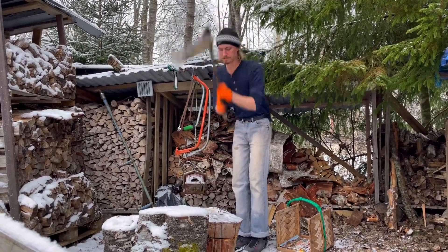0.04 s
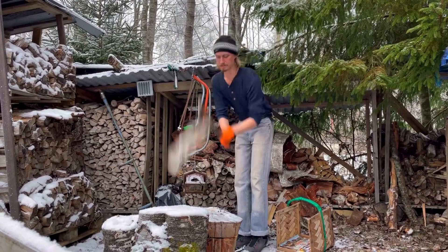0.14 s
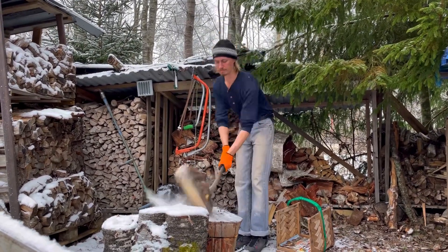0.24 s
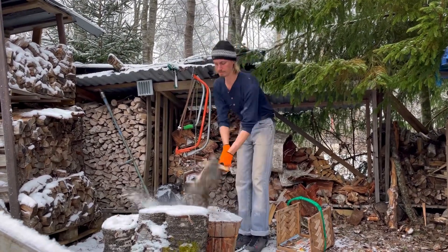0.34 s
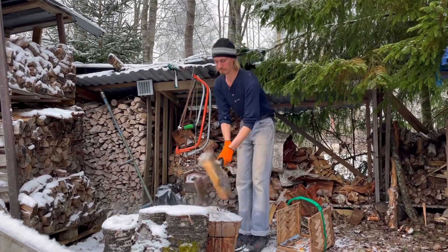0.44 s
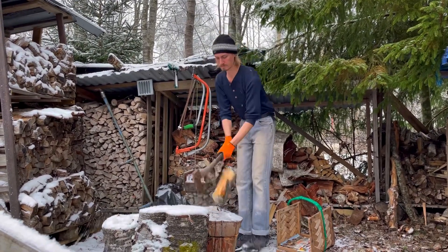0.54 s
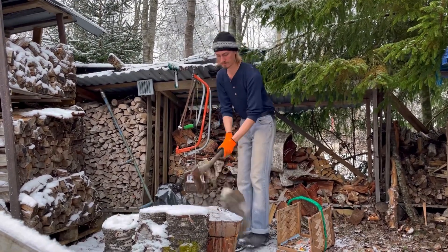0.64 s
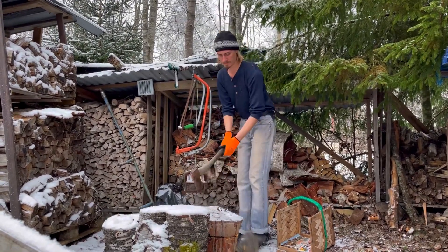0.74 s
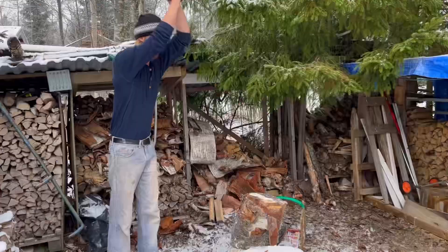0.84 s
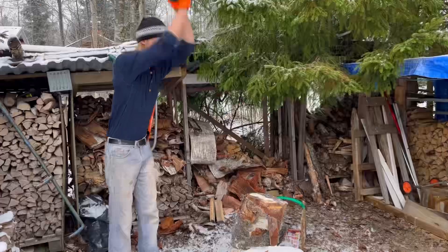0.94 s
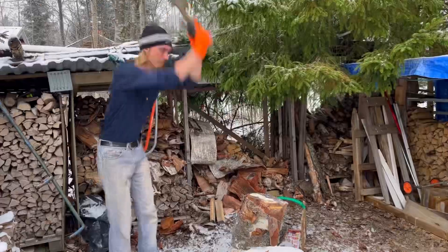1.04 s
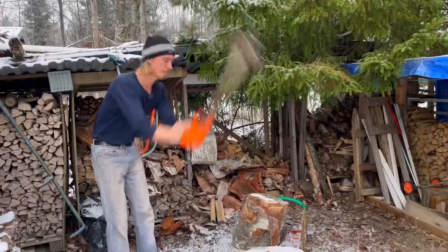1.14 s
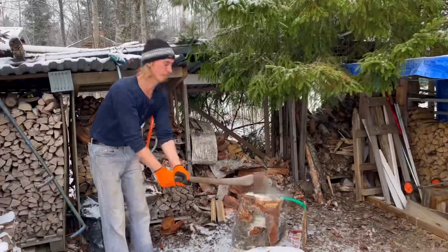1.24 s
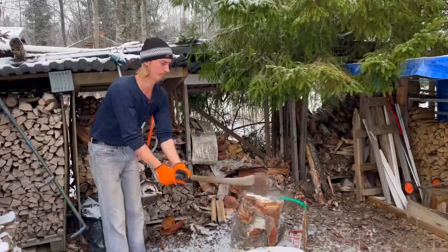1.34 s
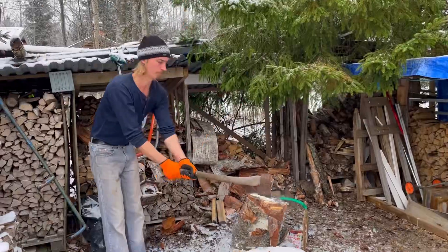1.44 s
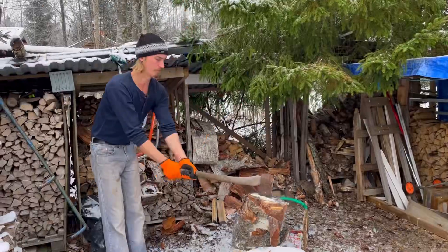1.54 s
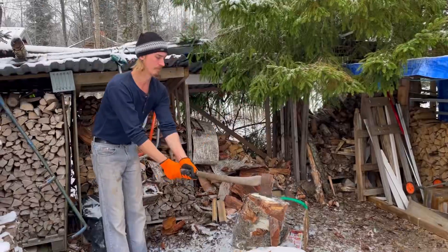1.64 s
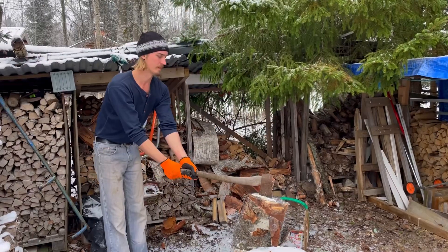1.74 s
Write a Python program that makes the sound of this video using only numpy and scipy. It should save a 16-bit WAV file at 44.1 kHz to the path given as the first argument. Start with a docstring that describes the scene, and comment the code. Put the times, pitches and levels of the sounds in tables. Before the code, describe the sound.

Three axe blows on wood in a quiet snowy yard: a bright splitting crack, light tumbling of pieces, a duller thump cut short abruptly, then a hard knock with ground rumble and faint echo from woodsheds.

```python
"""Axe at a chopping block

Three short shots in a snowy yard, joined by hard cuts. Cracking fibres are noise bursts, the log rings
as decaying modes, and block and frozen ground thud as sines of falling pitch over noise rumble.
Woodsheds and a tree line throw it back by convolution with decaying noise; split pieces scuff in
grainy noise and tick as short tones, over faint filtered-noise air and a far throbbing hum."""
import sys
import numpy as np
from scipy import signal
from scipy.fft import rfft, irfft
from scipy.io import wavfile

SR = 44100
rng = np.random.default_rng(int(sys.argv[2]) if len(sys.argv) > 2 else 0)


def file_out(sig):
    """Save sig as 16-bit WAV at sys.argv[1]."""
    # one column per channel
    cols = np.atleast_2d(sig).T
    # limit, then scale
    lim = np.clip(cols, -1, 1)
    pcm = np.round(lim * 32767).astype(np.int16)
    wavfile.write(sys.argv[1], SR, pcm)


N = 79380
T = np.arange(N) / SR
F = np.maximum(np.fft.rfftfreq(N, 1 / SR), 1)
# hard cuts between the shots: (time [s])
SHOT_CUTS = [0.775, 0.8627]


def undb(db):
    """Decibels to amplitude ratio."""
    return 10 ** (np.asarray(db) / 20)


def curve(table):
    """Frequency response interpolated on a logarithmic frequency axis."""
    hz, value = np.array(table).T
    return np.interp(np.log(F), np.log(np.maximum(hz, 1)), value)


def unit(x):
    """Normalization to an rms of 1."""
    return x / np.sqrt(np.mean(x ** 2))


def band(x, hz, octaves):
    """Band-pass filtering by a Gaussian bell on a log-frequency axis, rms 1."""
    bell = np.exp(-.5 * (np.log2(F / hz) / octaves) ** 2)
    return unit(irfft(rfft(x) * bell, N))


def fade(t, t60):
    """Exponential decay: 60 dB down after t60 seconds, silent before t = 0."""
    return np.exp(-np.log(1000) * np.maximum(t, 0) / t60) * (t >= 0)


def burst(hz, octaves, shape):
    """Band of noise under an envelope, scaled to the energy of that envelope."""
    x = band(rng.standard_normal(N), hz, octaves) * shape
    return x * np.sqrt(np.sum(shape ** 2) / np.sum(x ** 2))


def add(shots, start, x):
    """Superposition: a sound joins the shot in which it starts."""
    shots[np.searchsorted(SHOT_CUTS, start)] += x


def air():
    """Filtered noise for hiss and bass; frequency and amplitude modulation make the hum throb unevenly."""
    # spectrum of the hiss: (frequency [Hz], relative density [dB per Hz])
    hiss_spectrum = [(120, -40.5), (200, -10), (650, -10), (900, -14), (1500, -14.5), (2800, -10),
                     (5500, -8), (7500, -11), (8300, -20.5), (9200, -13), (11000, -13), (13300, -13.5),
                     (14200, -39.5)]
    # background levels: (time [s], hiss [dB], bass [dB], hum before its throb [dB])
    background = [(0, -63.5, -67, -71.5), (.05, -66.5, -60, -75.5), (.11, -62, -70.5, -78.5),
                  (0.302, -61.5, -56.5, -62.5), (.77, -63.5, -56.5, -76), (0.862, -54, -65, -74.5),
                  (0.8645, -77.5, -72, -86.5), (1.041, -83.5, -80.5, -86.5), (1.068, -71, -91.5, -125),
                  (1.152, -68.5, -79.5, -79), (1.246, -50.5, -66, -69), (1.521, -73, -68, -76),
                  (1.58, -69.5, -74.5, -74.5), (1.8, -68.5, -72, -70.5)]
    throb_hz, throb_depth = 31, .85  # mean rate; depth before squaring

    wobble = 1 + 0.23 * band(rng.standard_normal(N), 10, 0.74)
    throb = 1 + throb_depth * np.sin(2 * np.pi * np.cumsum(throb_hz * wobble) / SR)
    hum = band(rng.standard_normal(N), 850, .14) * throb ** 2 / 2
    flicker = undb(1.5 * band(rng.standard_normal(N), 8.6, 0.97))
    hiss = irfft(rfft(rng.standard_normal(N)) * undb(curve(hiss_spectrum)), N)
    hiss = unit(hiss) * flicker
    bass = band(rng.standard_normal(N), 68, 0.77)

    times, *levels = np.array(background).T
    return sum(x * undb(np.interp(T, times, db)) for x, db in zip((hiss, bass, hum), levels))


def ticks(shots):
    """Damped free vibration: a splinter or the blade rings as one quickly dying tone."""
    # (time [s], level [dB], frequency [Hz], t60 [s])
    tick_table = [(0.1034, -41, 4600, 0.0041), (0.1646, -49, 4590, .004), (0.2356, -9, 3500, 0.015),
                  (1.2121, -4.5, 3447, 0.013), (1.213, -10, 1395, 0.018), (1.677, -49.5, 4030, 0.0048),
                  (1.761, -53, 4040, 0.0027), (1.79, -52, 5000, .004)]
    for start, db, hz, t60 in tick_table:
        t = T - start
        add(shots, start, undb(db) * np.sin(2 * np.pi * hz * t) * fade(t, t60))


def cracks(shots):
    """Impulsive broadband radiation: blade and tearing fibres burst out with a sudden start."""
    # (time [s], level [dB], centre [Hz], width [octaves], t60 [s])
    crack_table = [(0.104, -48.5, 5100, 0.58, 0.046), (0.2052, -31.5, 2570, 1.46, 0.13),
                   (0.222, -25.5, 1690, 0.72, 0.021), (0.2282, -5.5, 1290, 1.1, 0.01118),
                   (0.2353, -11.5, 3430, 1.6, 0.011), (0.2388, -9.5, 2220, 1.2, 0.014),
                   (0.2425, -27.5, 1540, 1.5, 0.11), (0.482, -43.5, 2020, 2.3, 0.022),
                   (0.5112, -39, 2990, 3.1, 0.015), (0.603, -49.5, 1500, 0.7, 0.086),
                   (0.657, -42, 3000, 0.78, 0.0099), (0.778, -37, 3560, 1.57, 0.038),
                   (0.7859, -31, 3050, 1.46, 0.067), (0.790, -30, 1275, .8, 0.011),
                   (0.7941, -23, 5100, 1.1, 0.016), (0.96, -66.5, 490.3, 0.81, 0.028),
                   (1.2124, -9, 3540, 1.1, 0.021), (1.2195, -18.5, 1674, 0.71, 0.028),
                   (1.244, -36.5, 1450, 0.15, 0.01)]
    for start, db, hz, octaves, t60 in crack_table:
        add(shots, start, undb(db) * burst(hz, octaves, fade(T - start, t60)))


def rumbles(shots):
    """Diffuse low vibration: the ground rumbles on as a noise band after a blow or landing piece."""
    # (time [s], level [dB], centre [Hz], t60 [s])
    rumble_table = [(0.206, -17, 65.5, 0.29), (0.24, -33, 45, 1), (0.259, -29.5, 85.4, 0.43),
                    (0.605, -43, 220, 0.072), (0.651, -46.5, 230, 0.14), (0.655, -42, 60, 0.51),
                    (0.696, -55, 260, 0.1), (0.798, -26.5, 186.3, 0.16), (1.216, -19.5, 290, 0.12),
                    (1.224, -22.5, 42, 0.47), (1.274, -31, 75, 0.57), (1.269, -35, 188, 0.28),
                    (1.525, -52.5, 223, 0.081)]
    rise_s, octaves = 0.02, 0.51
    for start, db, hz, t60 in rumble_table:
        t = T - start
        rise = np.clip(t / rise_s, 0, 1)
        add(shots, start, undb(db) * burst(hz, octaves, rise * fade(t, t60)))


def thuds(shots):
    """Downward frequency glide: block and ground drop quickly in pitch as the low swing swells and dies."""
    # (time [s], level [dB], first pitch [Hz], last pitch [Hz], swell peak after start [s], swell width [s])
    thud_table = [(0.2096, -13.5, 348.4, 137, .005, 0.016), (0.245, -15.5, 180, 86, .025, 0.02),
                  (0.376, -31.5, 91.34, 64, .015, 0.03), (0.8013, -17, 286, 211, 0.0018, 0.005),
                  (0.7843, -25, 239, 140, .005, 0.014), (0.7987, -11, 330, 98.4, .022, 0.024),
                  (1.2148, -7.5, 507, 440, 0.0015, 0.0029), (1.2153, -10.5, 253, 88.4, .022, 0.032),
                  (1.269, -21, 158.5, 111.9, .012, 0.0069), (1.306, -26, 152, 111.3, 0.0023, 0.0045),
                  (1.33, -30, 107.5, 89, 0.029, 0.027), (1.47, -42, 81.3, 53.1, 0.0331, 0.05)]
    glide_s, attack_s = 0.0044, 0.0015  # time constant of the glide; linear attack
    for start, db, first_hz, last_hz, peak, width in thud_table:
        t = np.maximum(T - start, 0)
        # the integral of the falling frequency gives the phase in turns
        turns = last_hz * t + (first_hz - last_hz) * glide_s * (1 - np.exp(-t / glide_s))
        swell = np.exp(-((t - peak) / width) ** 2)
        attack = np.minimum(t / attack_s, 1)
        add(shots, start, undb(db) * np.sin(2 * np.pi * turns) * swell * attack)


def knocks(shots):
    """Modal excitation: a blow rings the log's modes, and a long, soft contact leaves the high ones out."""
    # (time [s], level [dB], pitch ratio [1], contact [ms])
    knock_table = [(0.2262, -15, 1.0, 1.2), (0.2305, -5, 1.0, 0.7), (0.2455, -24.5, 0.72, 1.3),
                   (0.51, -32.5, 2.04, 1.8), (0.790, -36, 1.6, .3), (0.7998, -19, .95, 3.2),
                   (1.214, -7.5, 1.16, 2.8), (1.332, -36, 1.24, 1.66)]
    # modes of the log at pitch ratio 1: (frequency [Hz], level [dB], t60 [s])
    log_modes = [(369.6, 1, 0.047), (609, 2, 0.022), (781, -1.5, 0.052), (914, -1.5, 0.025),
                 (1011, -12.5, 0.06), (1222, -5, 0.033), (1613, -10.5, .04), (2756, -6.5, 0.087)]
    for start, db, ratio, contact_ms in knock_table:
        t = T - start
        detune = 1 + .012 * rng.standard_normal(len(log_modes))
        for (hz, mode_db, t60), shift in zip(log_modes, detune):
            f = hz * ratio * shift
            gain = undb(db + mode_db) / (1 + (f * contact_ms / 1000) ** 3)
            add(shots, start, gain * np.sin(2 * np.pi * f * t) * fade(t, t60 / ratio))


def scuffs(shots):
    """Friction noise: split pieces on snow and bark give steady hiss mixed with fine random grains."""
    # (time [s], level [dB], centre [Hz], width [octaves], rise [s], t60 [s])
    scuff_table = [(0.333, -46.5, 930, 1.33, 0.0036, 0.13), (0.481, -47, 3780, 1.98, 0.003, 0.029),
                   (0.51, -45.5, 4500, 0.83, 0.0062, 0.19), (0.574, -56, 2805, .5, 0.0015, 0.03),
                   (0.603, -39.5, 4000, 0.84, 0.0055, 0.06), (0.641, -42, 5240, 0.76, 0.0034, 0.09),
                   (0.688, -54, 2560, 1.2, 0.0017, 0.046), (0.7, -53, 3260, 1.1, 0.00093, 0.06),
                   (0.746, -52, 4970, 1.3, 0.0012, 0.027)]
    grains_per_s, grain_db, grain_share = 1500, 0.5, 0.73  # grain_db: mean of the exponential spread
    for start, db, hz, octaves, rise_s, t60 in scuff_table:
        hits = rng.random(N) < grains_per_s / SR
        grains = hits * undb(grain_db * rng.exponential(size=N)) * rng.standard_normal(N)
        rub = rng.standard_normal(N) + grain_share * unit(grains)
        rise = np.clip((T - start) / rise_s, 0, 1)
        # the decay begins only when the rise is over
        decay = np.where(T > start + rise_s, fade(T - start - rise_s, t60), 1)
        add(shots, start, undb(db) * band(rub, hz, octaves) * rise * decay)


def yard():
    """Reverberation with a double decay: sheds and stacks answer with a quick and a slow fade in each band."""
    # (centre [Hz], early relative level [dB], early t60 [s], late relative level [dB], late t60 [s])
    yard_bands = [(180, -2.5, 0.19, -23.5, 0.38), (426, -15.5, 0.2, -28.5, 0.71),
                  (630, -10.5, 0.088, -28, 1), (1450, -18.5, 0.061, -33, 0.91),
                  (3380, -20, 0.1, -38.5, 0.93), (5930, -25, .12, -35, 0.2),
                  (11300, -19, 0.049, -46.5, 0.94)]
    t = T - 0.0095  # delay of the first echo [s]
    response = 0
    for hz, early_db, early, late_db, late in yard_bands:
        quick = undb(early_db) * fade(t, early) / np.sqrt(early)
        slow = undb(late_db) * fade(t, late) / np.sqrt(late)
        response = response + band(rng.standard_normal(N), hz, .55) * (quick + slow) * np.sqrt(hz)
    return 8 * response / SR


def tree_line():
    """Distant scattering: a late, narrow-band echo swells up and dies."""
    delay_s, rise_s, t60, hz, relative_db = 0.18, 0.069, 0.7, 1500, -34.5
    t = T - delay_s
    swell = np.clip(t / rise_s, 0, 1) * fade(t, t60) / np.sqrt(t60)
    return 8 * band(rng.standard_normal(N), hz, .3) * undb(relative_db) * swell * np.sqrt(hz) / SR


def echoes(sent):
    """Convolution: each shot excites the yard and the tree line at its own two gains."""
    # one row a shot, as each stands at its own place in the yard: (gain of the yard echo [dB])
    yard_gain = [1, 5.5, 7]
    # one row a shot: (gain of the tree-line echo [dB])
    tree_gain = [-4, -14, 3.5]
    near, far = yard(), tree_line()
    return np.array([signal.fftconvolve(x, a * near + b * far)[:N]
                     for x, a, b in zip(sent, undb(yard_gain), undb(tree_gain))])


def scene():
    """Mid-side stereo: direct sound in the middle, independent echoes and air at the sides."""
    sharp, log, low = np.zeros((3, 3, N))  # each holds three shots
    ticks(log)
    cracks(sharp)
    rumbles(low)
    thuds(low)
    knocks(log)
    scuffs(sharp)

    sent = sharp + undb(-17) * log  # the log feeds the echo weakly, the thuds not at all
    keep = np.searchsorted(SHOT_CUTS, T) == np.arange(3)[:, None]  # each shot sounds between its cuts
    mid = ((sharp + log + low + echoes(sent)) * keep).sum(axis=0) + air()
    side_air = signal.lfilter([1, -1], [1, -.8], air())  # high-pass
    side = 0.44 * ((echoes(sent) * keep).sum(axis=0) + side_air)
    return np.array([mid + side, mid - side])


def record(dry):
    """Interchannel phase and level differences of two close ports; saturation and a low-pass follow."""
    # response of the microphone: (frequency [Hz], gain [dB])
    mic_response = [(30, -2.5), (1000, 6), (6000, -3), (7600, -2), (8300, -13.5), (9100, 0), (11000, -2),
                    (13600, -2), (14300, -19), (16000, -18)]
    # phase between the ports: (frequency [Hz], lead of left over right [rad])
    port_phase = [(0, .17), (350, .2), (700, .5), (1900, .7), (4200, 1.05), (5800, .4), (7000, -1.9),
                  (8300, -3.14), (9200, -4.2), (10600, -5.6), (12000, -7.4), (13500, -9.2), (16000, -9.6)]
    # level between the ports: (frequency [Hz], left above right [dB])
    port_level = [(60, -.5), (250, .5), (700, -1), (1400, .2), (3000, 1.8), (6000, 1.5), (10000, -.4),
                  (15000, .1)]
    ceiling, top_hz = .92, 15900  # rounding of peaks [full scale]; edge of the low-pass [Hz]

    # each port takes half of the difference
    left = undb(curve(port_level) / 2) * np.exp(.5j * np.interp(F, *np.array(port_phase).T))
    wet = irfft(rfft(dry) * undb(curve(mic_response)) * np.array([left, 1 / left]), N)
    wet = ceiling * np.tanh(wet / ceiling)
    return signal.sosfilt(signal.ellip(10, .2, 80, top_hz, fs=SR, output="sos"), wet)


dry = scene()
out = record(dry)
file_out(out)
```